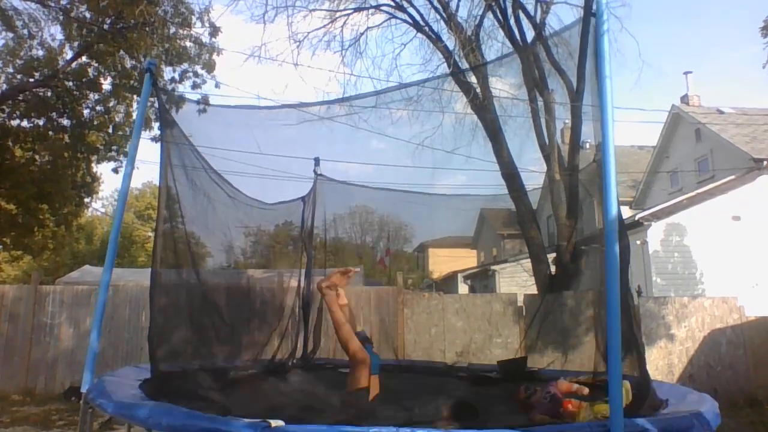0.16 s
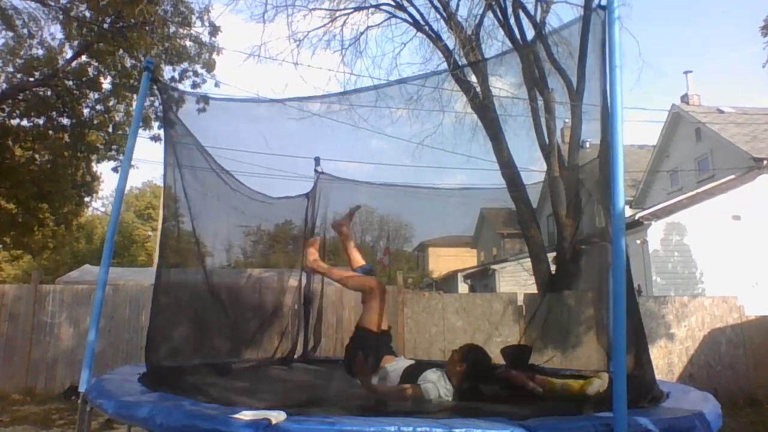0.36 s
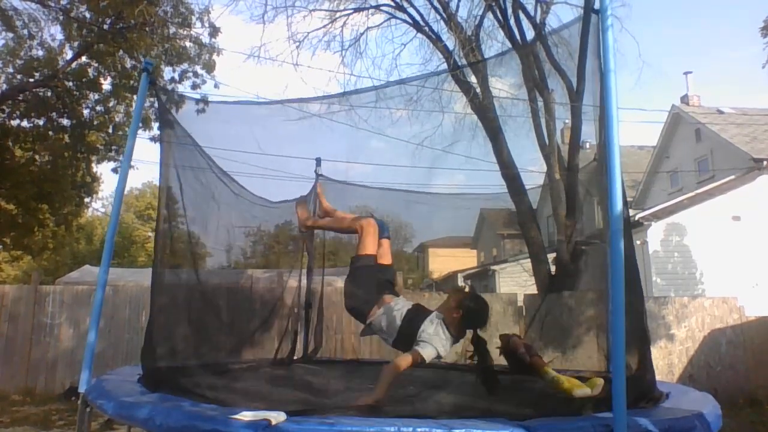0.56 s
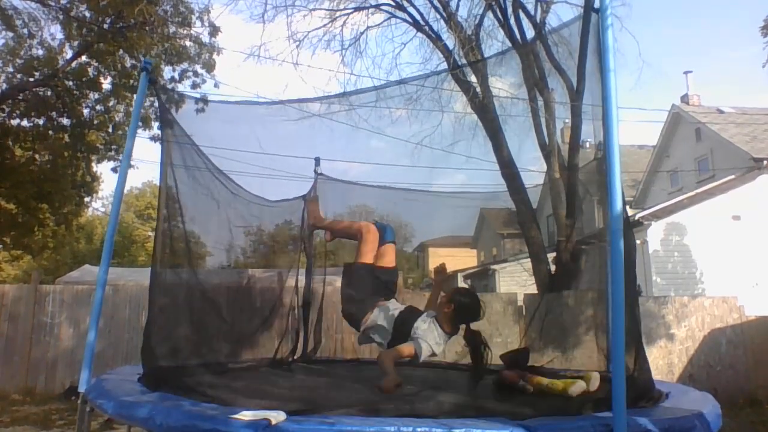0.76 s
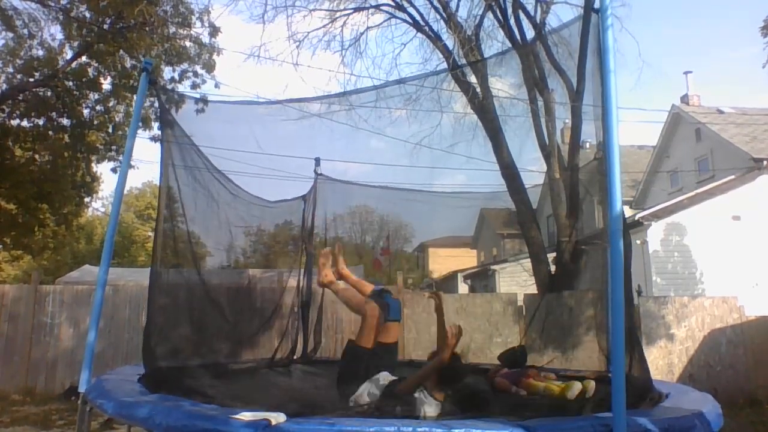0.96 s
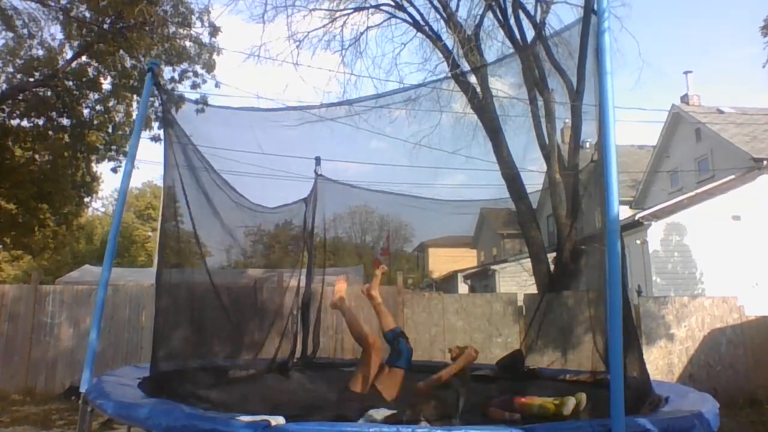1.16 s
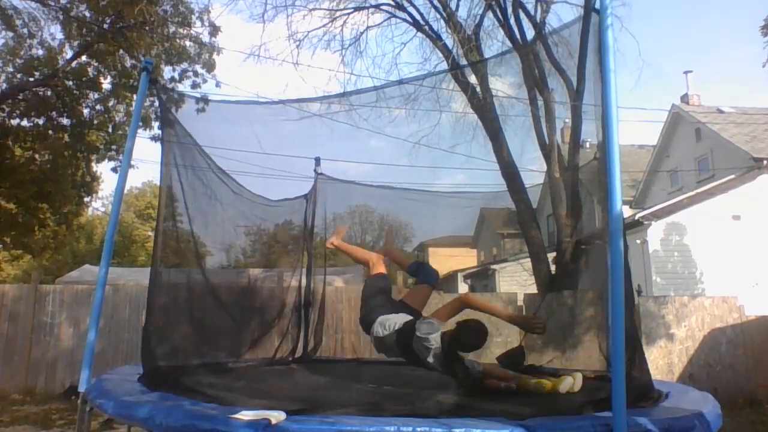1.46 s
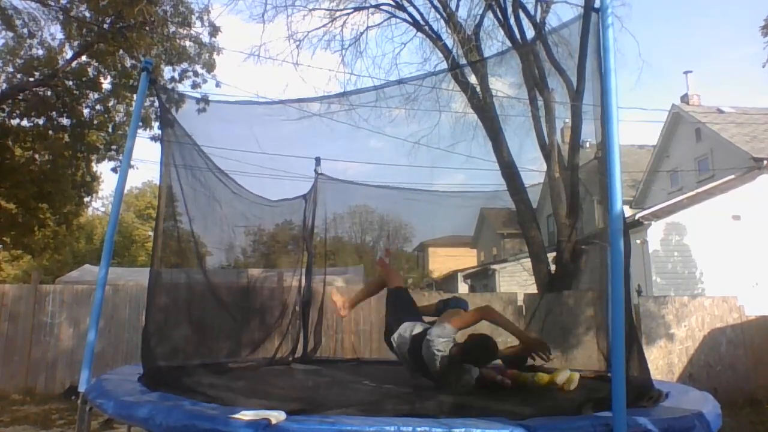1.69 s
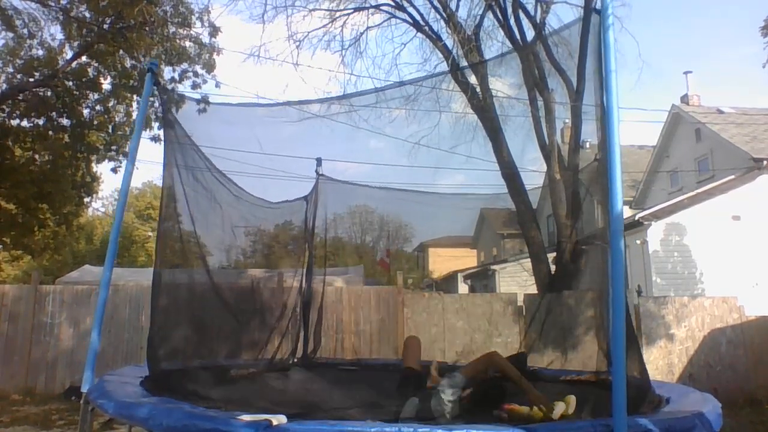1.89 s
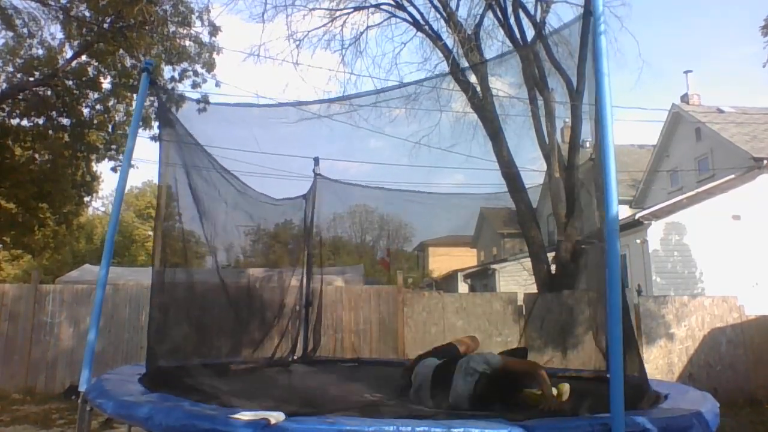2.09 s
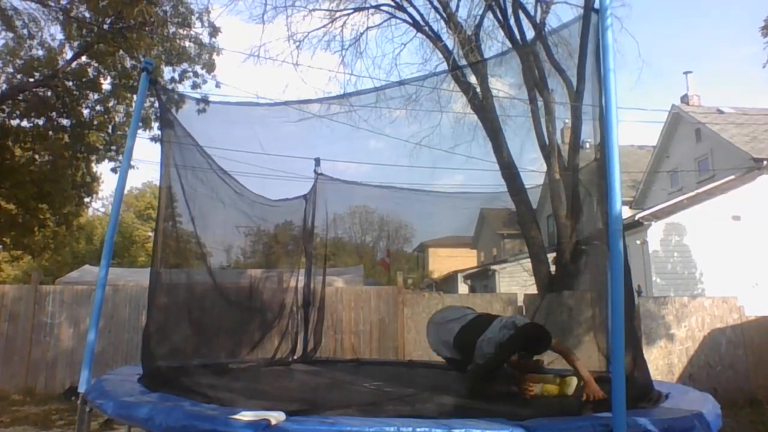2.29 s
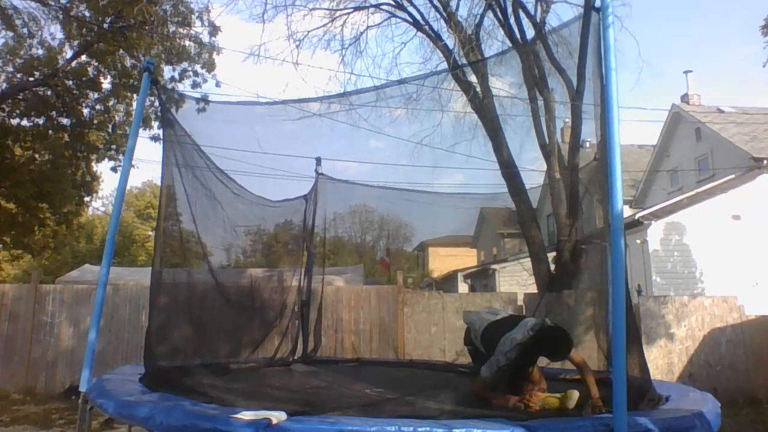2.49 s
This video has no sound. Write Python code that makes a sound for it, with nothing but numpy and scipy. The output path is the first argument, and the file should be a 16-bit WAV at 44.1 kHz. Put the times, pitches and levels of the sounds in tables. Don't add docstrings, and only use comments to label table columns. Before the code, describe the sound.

Trampoline bounces: one heavy thump and scuff, two softer drops, then knocks on the padded frame

```python
import sys
import numpy as np
from scipy import signal
from scipy.fft import rfft, irfft, next_fast_len
from scipy.io import wavfile
from scipy.ndimage import uniform_filter1d, map_coordinates

SR = 44100
rng = np.random.default_rng(int(sys.argv[2]) if len(sys.argv) > 2 else 0)


def magnitude_from_level(level_db):
    exponent = np.asarray(level_db, float) / 20
    return 10 ** exponent


def digitize_waveform(pressure):
    field = np.atleast_2d(pressure).T
    bounded = np.clip(field, -1, 1)
    quanta = np.round(bounded * 32767).astype(np.int16)
    wavfile.write(sys.argv[1], SR, quanta)


N = 116865


def unit(x):
    return x / np.sqrt(np.mean(x ** 2) + 1e-20)


def curves(rows):
    times, *columns = np.transpose(rows)
    return [np.interp(np.arange(N) / SR, times, column) for column in columns]


def wobble(count):
    knots = rng.standard_normal(int(N * count / SR) + 4)
    return map_coordinates(knots, [np.arange(N) * count / SR])


def filtered(x, response):
    size = next_fast_len(N + SR // 2)
    return irfft(rfft(x, size) * response(np.fft.rfftfreq(size, 1 / SR)), size)[..., :N]


def colour(points):
    f, db = np.transpose(points)
    return lambda hz: magnitude_from_level(np.interp(np.log(hz + 1), np.log(f + 1), db, left=-120, right=-120))


def resonant(modes):
    def response(f):
        total = 0
        for k, (centre, width, db) in enumerate(modes):
            peak = 1j * f * width / (centre * centre - f * f + 1j * f * width)
            total = total + (-1) ** k * magnitude_from_level(db) * peak
        return total
    return response


def patchy(patchy_db):
    z = signal.stft(rng.standard_normal(N + 512), nperseg=512)[2]
    across = uniform_filter1d(rng.standard_normal(z.shape), size=2, axis=0)
    streaks = unit(uniform_filter1d(across, size=14, axis=1))
    return unit(signal.istft(z * magnitude_from_level(patchy_db * streaks), nperseg=512)[1][:N])


def ring(modes, attack_s):
    t = np.arange(SR // 4) / SR
    tones = sum(magnitude_from_level(db - 60 * t / t60) * np.sin(2 * np.pi * hz * t) for hz, db, t60 in modes)
    return (1 - np.exp(-(t / attack_s) ** 2)) * tones


def puff(modes, t60):
    t = np.arange(SR // 4) / SR
    response = resonant(modes)(np.fft.rfftfreq(len(t), 1 / SR)) ** 4
    noise = irfft(rfft(rng.standard_normal(len(t))) * response, len(t))
    return unit(noise) * magnitude_from_level(-60 * t / t60) * (1 - np.exp(-(t / 0.0011) ** 2))


def swell(length):
    return np.sin(np.linspace(0, np.pi, round(length * SR))).clip(0) ** .5


def add(track, s, sound):
    track[round(s * SR):][:len(sound)] += sound


# frequency in Hz, density in dB per Hz.
YARD_COLOUR = [(15, -48.5), (25, -24.5), (49, -8), (127, -6.5), (341, -34.5), (557, -34), (696, -36.5),
               (1010, -36), (4000, -56.5), (9020, -66.5), (11700, -69), (19800, -120)]


def yard():
    drift = magnitude_from_level(-69.5 + wobble(count=4))
    return drift * unit(filtered(patchy(patchy_db=1.0), colour(YARD_COLOUR)))


def fence(x):
    level_db, t60_s, delay = -17, 0.12, 600
    t = np.arange(SR // 3) / SR
    tail = rng.standard_normal(len(t)) * magnitude_from_level(-60 * t / t60_s)
    tail = tail / np.linalg.norm(tail)
    return magnitude_from_level(level_db) * signal.fftconvolve(np.pad(x, (delay, 0)), tail)[:N]


# start in seconds, level in dB, pitch in Hz, t60 in seconds.
HOOK_TICKS = [(.548, -52, 3500, .025), (.7, -68, 1500, .05), (.7, -72, 6000, .04), (.798, -78, 1500, .03),
              (1.14, -70, 7000, .08), (1.171, -54, 2200, .03), (1.207, -46, 2500, .02),
              (1.631, -58, 1500, .035), (1.631, -60, 3200, .03), (1.631, -63, 7300, .05),
              (1.612, -60, 7600, .05), (1.982, -70, 7300, .06), (2.012, -60, 3500, .04),
              (2.1495, -33, 5200, .013), (2.372, -43, 4800, .025), (2.391, -44, 5800, .025),
              (2.495, -74, 7300, .05), (2.565, -75, 7500, .03), (2.619, -63, 6300, .1)]
# frequency in Hz, gain in dB.
MIC_TREBLE = [(10, 0), (7500, 0), (9300, -30)]


def ticks():
    out = np.zeros(N + SR)
    for s, db, hz, t60 in HOOK_TICKS:
        add(out, s, magnitude_from_level(db) * puff([(hz, hz, 0)], t60))
    return filtered(out[:N], colour(MIC_TREBLE))


# start in seconds, length in seconds, pitch in Hz, level in dB.
SPRING_SINGS = [(.28, .13, 3096, -48), (.3, .06, 2780, -47), (.32, .04, 2250, -52), (.36, .05, 3200, -48),
                (.33, .07, 3590, -50), (.26, .05, 1040, -52), (.23, .07, 1850, -54), (.55, .05, 5200, -67),
                (.45, .13, 1830, -57), (.42, .16, 3250, -56), (1.155, .07, 980, -51),
                (1.22, .06, 1150, -52), (.34, .14, 1080, -54), (1.2, .08, 3200, -51), (1.16, .1, 4850, -53),
                (1.16, .1, 2100, -54), (1.28, .07, 1200, -64), (1.4, .11, 2950, -52), (1.4, .13, 5150, -56),
                (1.38, .14, 1620, -56), (1.4, .09, 1050, -60), (2.04, .06, 2130, -55),
                (2.105, .05, 5400, -51), (2.11, .045, 4850, -52), (2.04, .06, 2950, -54),
                (2.1, .06, 3200, -54), (2.01, .08, 5200, -57), (2.02, .08, 5900, -57),
                (2.05, .05, 6600, -58), (2.23, .14, 4030, -53), (2.25, .1, 3100, -53),
                (2.23, .08, 2750, -59), (2.26, .07, 5450, -53), (2.33, .09, 5400, -58),
                (2.26, .18, 6700, -61)]


def sings():
    out = np.zeros(N + SR)
    for s, length, hz, db in SPRING_SINGS:
        response = resonant([(hz, hz * .06, 0)])
        band = filtered(rng.standard_normal(N), lambda f: response(f) ** 2)
        settled = band[SR:][:round(length * SR)]
        add(out, s, magnitude_from_level(db) * swell(length) ** 2 * unit(settled))
    return out[:N]


# time in seconds, pitch in Hz, level in dB rms.
TAUT_TONE = [
    (1.96, 148.8, -86.5),
    (2.038, 149.3, -55),
    (2.186, 149.8, -47),
    (2.31, 155.8, -50.5),
    (2.38, 154, -57),
    (2.39, 158.0, -68),
]


def taut():
    first, last = TAUT_TONE[0], TAUT_TONE[-1]
    fade_in = (first[0] - .05, first[1], -120)
    fade_out = (last[0] + .05, last[1], -120)
    hz, db = curves([fade_in] + list(TAUT_TONE) + [fade_out])
    return np.sqrt(2) * magnitude_from_level(db) * np.sin(2 * np.pi * np.cumsum(hz) / SR)


# start in seconds, length in seconds, pitch in Hz, level in dB.
STRETCH_HUMS = [(.304, .054, 63, -27), (.2, 0.11, 136.4, -40), (.53, .09, 150, -55),
                (.36, 0.21, 134.3, -42.5), (.42, 0.181, 168, -47.5), (1.16, 0.089, 70.2, -46),
                (1.27, 0.065, 69, -45.5), (1.38, 0.073, 65.6, -46), (1.47, 0.067, 66.5, -47),
                (1.59, 0.074, 66, -54.5), (1.17, .12, 127, -54), (1.3, 0.22, 136.4, -56),
                (1.4, 0.3, 149, -56), (2.42, 0.046, 160, -50), (2.548, 0.037, 169, -47.5),
                (2.17, 0.13, 87.7, -52), (2, .07, 60, -53), (2.09, .06, 66, -52), (2.07, .06, 210, -57)]


def hums():
    out = np.zeros(N + SR)
    for s, length, hz, db in STRETCH_HUMS:
        shape = swell(length)
        waver = 1 + .008 * wobble(5)[:len(shape)]
        cycles = np.cumsum(hz * waver) / SR
        add(out, s, magnitude_from_level(db) * shape * np.sin(2 * np.pi * cycles))
    return out[:N]


# start in seconds, level in dB, pitch in Hz, t60 in seconds.
BODY_THUMPS = [
    (0.2195, -23, 95, 0.04),
    (0.317, -28, 87, 0.07),
    (.3255, -24, 280, 0.07),
    (0.337, -27, 62, 0.06),
    (2.4, -42, 122, .12),
]


def thumps():
    out = np.zeros(N + SR)
    for s, db, hz, t60 in BODY_THUMPS:
        add(out, s, ring([(hz, db, t60)], attack_s=0.0016))
    return out[:N]


# time in seconds, strength in dB, share of the upper modes in dB.
MAT_LOAD = [(0.0, -70.5, 4.5), (0.18, -70.5, -9), (0.21, -46.5, 1.5), (0.31, -35, -0.5), (.4, -44, 0),
            (.55, -51.5, -1), (0.68, -59.5, -4), (0.87, -75, -5.5), (1.14, -68, -4), (1.2, -56, 2),
            (1.62, -63, -6), (1.74, -74.5, 4.5), (1.96, -75.5, -2), (2.03, -57.5, 1), (2.13, -46.5, 1.5),
            (2.3, -56.5, -3), (2.45, -67, 4), (2.65, -64, -8)]
# frequency in Hz, width in Hz, level in dB.
LOW_MODES = [(62.7, 6, 2), (94, 18, -2)]
HIGH_MODES = [(131.04, 5.4, -3), (149.3, 6.5, 2), (204, 100, -8.5)]


def mat():
    def shaken(modes):
        response = resonant(modes)
        return unit(filtered(rng.standard_normal(N), lambda f: response(f) ** 2))

    load_db, upper_db = curves(MAT_LOAD)
    boom = magnitude_from_level(-upper_db) * shaken(LOW_MODES) + magnitude_from_level(upper_db) * shaken(HIGH_MODES)
    return thumps() + hums() + taut() + magnitude_from_level(load_db - 1.5) * boom


# start in seconds, peak
# level in dB.
EARLY_KNOCKS = [(0.379, -28.5), (0.416, -28), (0.517, -26)]


def early_knocks():
    out = np.zeros(N + SR)
    for s, db in EARLY_KNOCKS:
        add(out, s - .004, magnitude_from_level(db + 10.5) * ring([(545, 0, 0.03)], attack_s=0.01))
    return out[:N]


# start in seconds, level in dB.
SKIN_SLAPS = [
    (0.199, -66),
    (0.2172, -45),
    (0.24, -45),
]
# frequency in Hz, width in Hz, level in dB.
SLAP_BODY = [(600, 850, 0)]


def slaps():
    out = np.zeros(N + SR)
    for s, db in SKIN_SLAPS:
        add(out, s, magnitude_from_level(db) * puff(SLAP_BODY, t60=.05))
    return out[:N]


# start in seconds, peak in dB, sole click in dB, ring length factor.
SHOE_KNOCKS = [
    (2.186, -36, -22, .7),
    (2.399, -28, -11, 1.1),
    (2.56, -31, -36, .6),
]
# frequency in Hz, level in dB, t60 in seconds.
PAD_MODES = [(170, -6, 0.05), (430, -4, 0.04), (544, 6, 0.04), (650, -3, .035), (759, -4, 0.03)]
SOLE_MODES = [(1314, 5, 0.04), (1470, 6, 0.035), (1680, 2, 0.025)]
# frequency in Hz, width in Hz, level in dB.
PAD_RATTLE = [(520, 380, 0)]


def knocks():
    bounce_s, bounce_db, click_lead_s = .031, -14, .004

    def varied(modes, bounce, rings):
        return [(hz * (rng.normal(1, 0.0083) - .035 * bounce), level + rng.normal(0, bounce), t60 * rings)
                for hz, level, t60 in modes]

    out = np.zeros(N + SR)
    for s, db, click_db, rings in SHOE_KNOCKS:
        add(out, s, magnitude_from_level(db - 19) * puff(PAD_RATTLE, t60=.22))
        for k in range(3):
            strike_s = s + k * bounce_s
            pad = ring(varied(PAD_MODES, k, rings), attack_s=0.0048)
            add(out, strike_s, magnitude_from_level(db + k * bounce_db) * pad)
            sole_db = db + click_db - 1.5 + k * (bounce_db - 3 * k)
            sole = ring(varied(SOLE_MODES, k, rings), attack_s=0.0019)
            add(out, strike_s - click_lead_s, magnitude_from_level(sole_db) * sole)
    return out[:N]


# time in seconds, strength in dB, brightness from 0 to 1.
FIRST_DROP = [
    [(0, -58.5, 0.98), (.06, -92, 1)],
    [(.222, -92, 0.2), (.236, -59, 0), (.262, -41.5, 0.11), (.33, -38, 0.9), (.355, -39, 0.13),
     (.385, -38.5, 0), (.42, -48, 0.11), (.44, -45.5, 0.26), (.48, -48, 0.04)],
    [(.51, -45.5, 0), (.565, -53.5, 0.05), (.6, -68, 0.55), (.64, -71, 0.74), (.7, -69.5, 0.7),
     (.745, -81, 0.99), (.775, -90.5, 0.6), (.85, -90.5, 0.7)],
]
SECOND_DROP = [
    [(1.11, -92, 0.29), (1.15, -69, 0.67), (1.175, -50.5, 0.13), (1.21, -46, 0.65), (1.255, -41.5, 0.88),
     (1.3, -57, 0.18), (1.355, -62, 0.3)],
    [(1.43, -46.5, 0.62), (1.48, -49, 0.49), (1.53, -61.5, 0.93), (1.575, -73, 0.92), (1.64, -73, 0.86),
     (1.7, -86.5, .7), (1.8, -92, 0.48)],
]
THIRD_DROP = [
    [(1.97, -90.5, 0.44), (2.005, -67, 1), (2.02, -54, 0.41), (2.075, -44, 0.9), (2.105, -48, 0.8),
     (2.128, -47, 0.74), (2.16, -51, 0.53), (2.21, -63, 1)],
    [(2.24, -55.5, 0.73), (2.285, -47, 1), (2.335, -49, 0.97), (2.365, -56, 0.91), (2.405, -60.5, 0.93),
     (2.42, -67.5, 0.15), (2.54, -86.5, 0.44)],
    [(2.61, -81, 1), (2.622, -69, 0.98), (2.65, -74, 1)],
]
# frequency in Hz, density in dB per Hz.
DULL_CLOTH = [(150, -42.5), (250, -10), (554, -0.5), (750, -10), (1100, -5), (2100, -2.5), (3100, -4.5),
              (4600, -14.5), (7200, -22.5), (9020, -44), (11000, -120)]
BRIGHT_CLOTH = [(150, -48.5), (250, -30.5), (1070, -9), (3110, -2), (4730, -3.5), (5420, -2.5), (7880, -9),
                (9020, -36), (11700, -84.5), (19800, -120)]


def scuff():
    grain_db, grains_per_s, grain_spread_db = -8, 3000, 2.5
    strength_db, bright = curves([row for table in FIRST_DROP + SECOND_DROP + THIRD_DROP for row in table])
    bright = np.clip(bright, 0, 1)
    slipping = rng.random(N) < grains_per_s / SR
    slips = slipping * rng.standard_normal(N) * magnitude_from_level(grain_spread_db * rng.exponential(1, N))
    raw = patchy(patchy_db=2.6) + magnitude_from_level(grain_db) * unit(slips)
    pressed = np.sqrt(1 - bright) * unit(filtered(raw, colour(DULL_CLOTH)))
    brushing = np.sqrt(bright) * unit(filtered(raw, colour(BRIGHT_CLOTH)))
    unevenness_db = 1.5 * wobble(60) + 0.37 * wobble(200)
    return magnitude_from_level(strength_db + unevenness_db) * (pressed + brushing)


def scene():
    near = ticks() + sings() + early_knocks() + slaps() + knocks() + scuff()
    return (yard() + fence(near) + mat() + near)[None]


def top_cut(x):
    return signal.sosfilt(signal.butter(12, 9170, fs=SR, output="sos"), x)


def record(dry):
    def response(hz):
        bass = (hz / (hz - 30j)) ** 2
        return bass * np.clip((9200 - hz) / 500, 0, 1)

    hiss = magnitude_from_level(-101.5) * rng.standard_normal(dry.shape)
    mix = filtered(dry, response) + hiss
    return top_cut(mix)


dry = scene()
out = record(dry)
digitize_waveform(out)
```